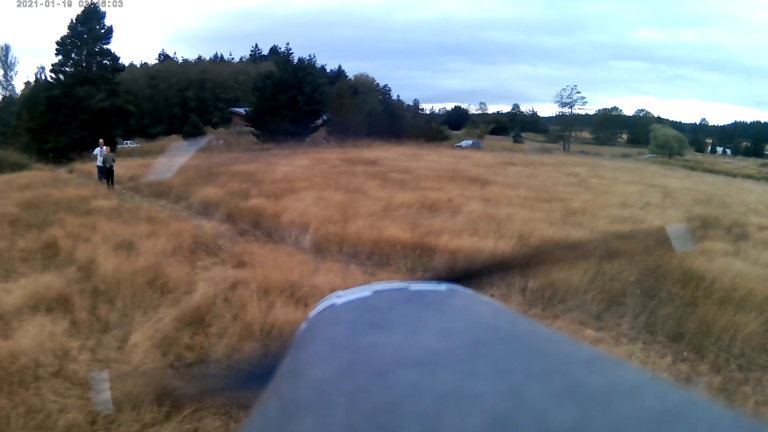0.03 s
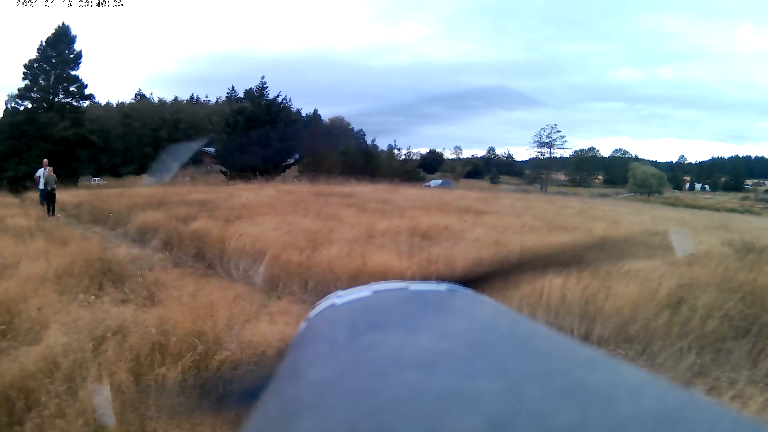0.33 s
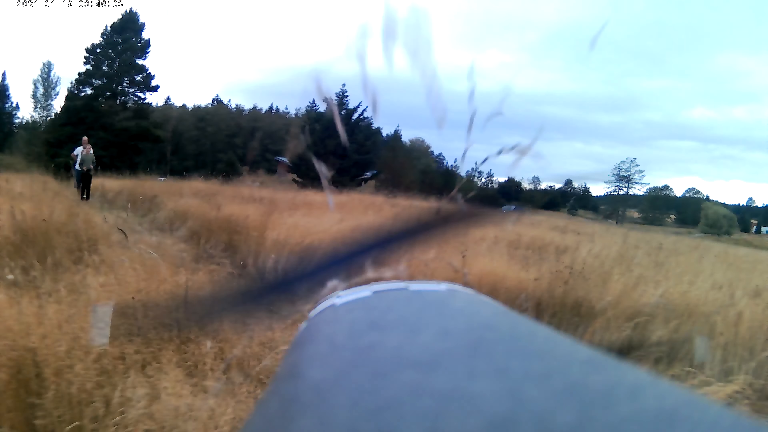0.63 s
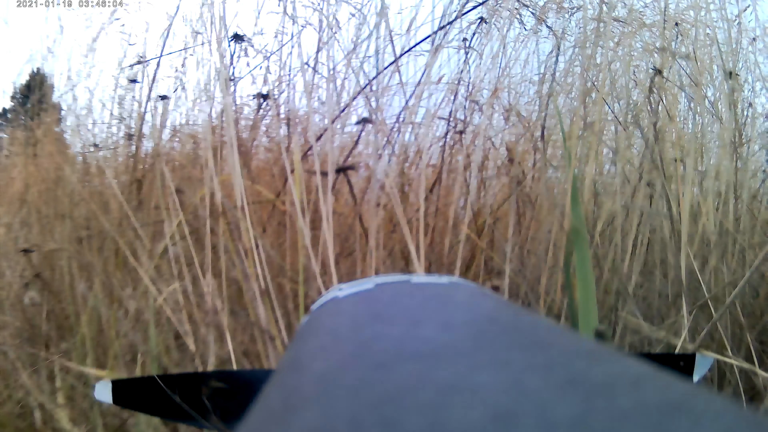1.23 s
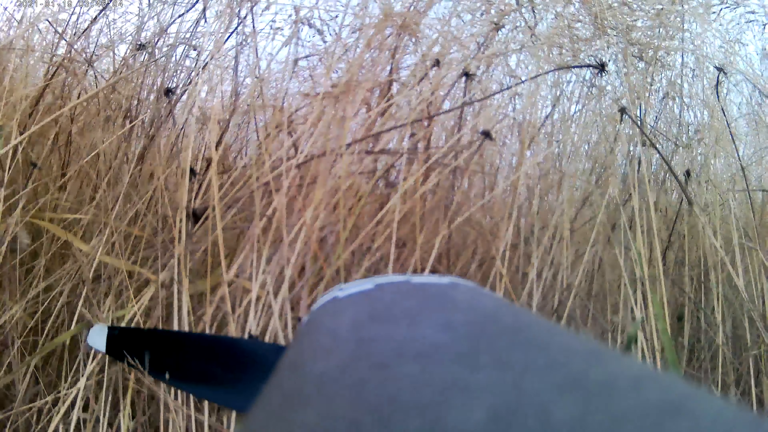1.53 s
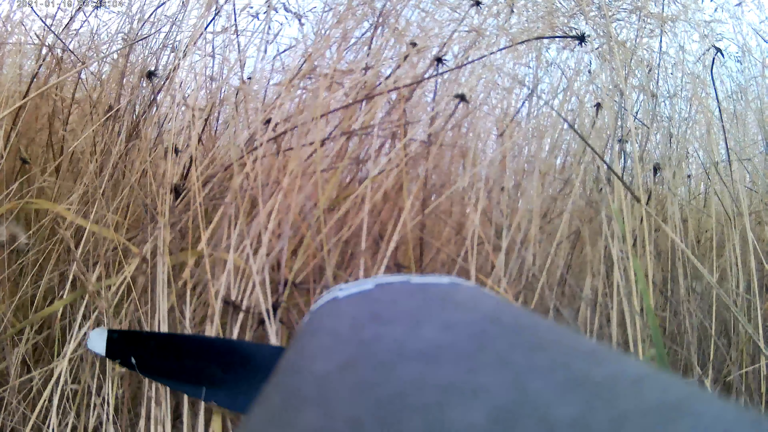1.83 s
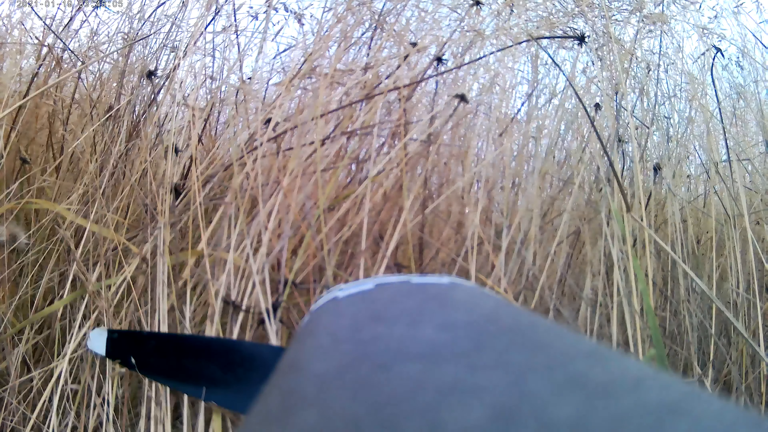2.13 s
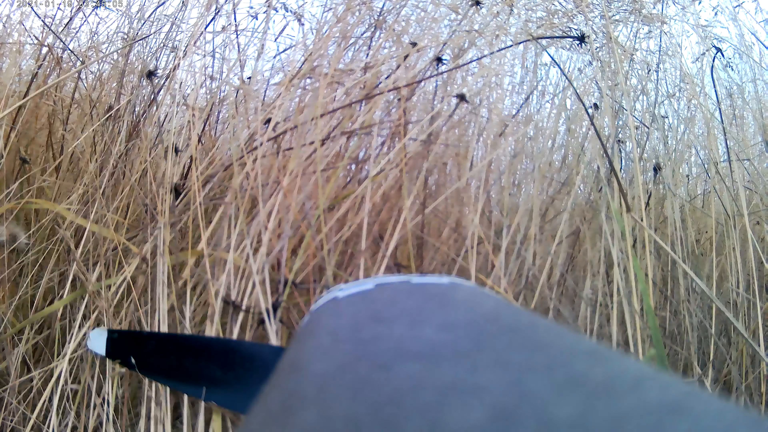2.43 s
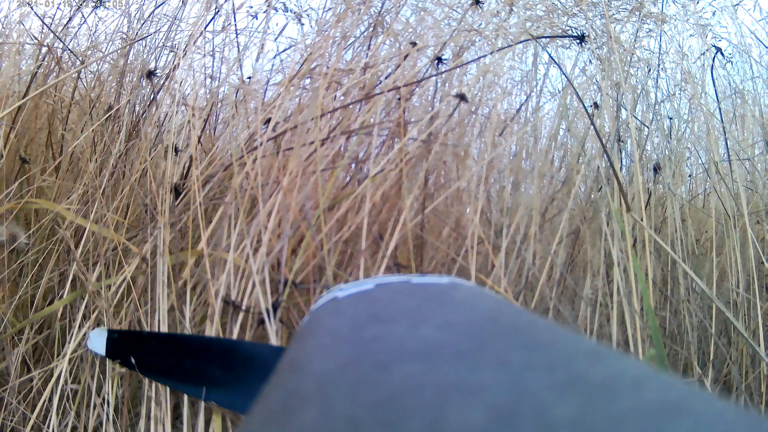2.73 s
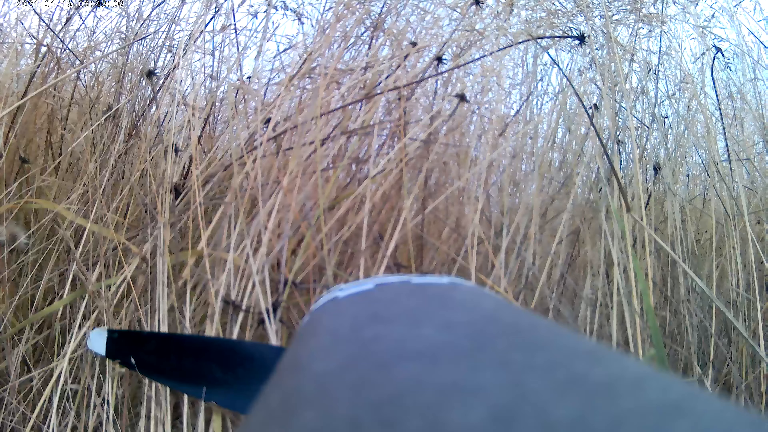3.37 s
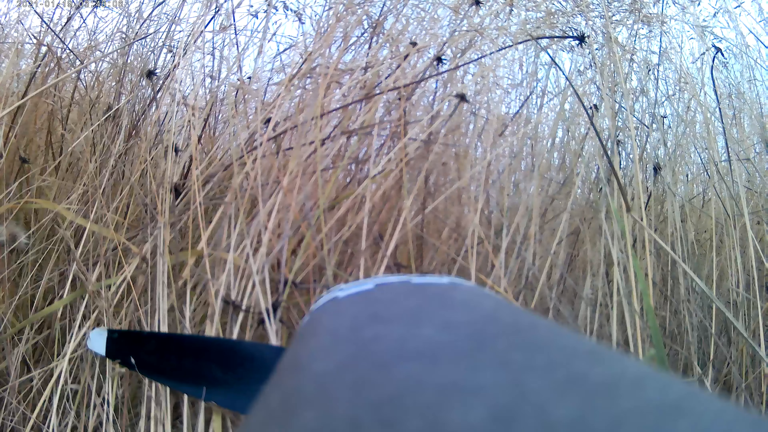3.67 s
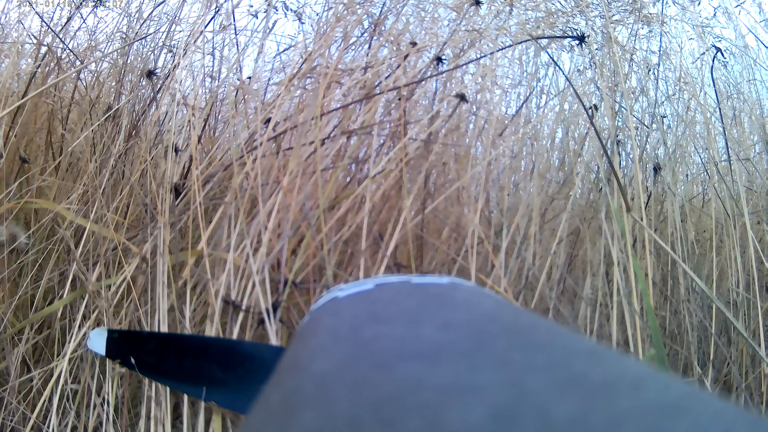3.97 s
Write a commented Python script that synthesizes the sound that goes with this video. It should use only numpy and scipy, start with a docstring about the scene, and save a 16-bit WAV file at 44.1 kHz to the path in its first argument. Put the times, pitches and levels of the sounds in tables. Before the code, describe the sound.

Wind roars over a gliding model plane, which crashes into dry grass; its servos whirr.

```python
"""A field of tall dry grass: a small model plane glides in low and crashes, heard from on its back.
Wind overloads the microphone and nearly hides the motor's whine. Stalks lash the airframe, whose
modes ring as it bumps to a stop. The servo gears whirr, then only twitch in a light breeze."""
import sys
import numpy as np
from scipy import signal
from scipy.fft import rfft, irfft
from scipy.io import wavfile

SR = 44100
rng = np.random.default_rng(int(sys.argv[2]) if len(sys.argv) > 2 else 0)


def pcm_store(signal):
    """Save signal as 16-bit PCM."""
    levels = np.round(np.clip(np.atleast_2d(signal), -1, 1) * 32767)
    wavfile.write(sys.argv[1], SR, levels.astype(np.int16).T)


N = 176400
T = np.arange(N) / SR

# servo gear noise spectrum: f/Hz, level/dB
GEAR_SPECTRUM = [(60, -16.5), (230, -5), (760, 0), (1100, -10), (1450, -6.5), (2600, -22.5), (4200, -19.5)]


def from_db(db):
    """Decibels to gain."""
    return 10 ** (np.asarray(db) / 20)


def rms_one(x):
    """Scale to unit power."""
    return x / np.sqrt(np.mean(x ** 2) + 1e-20)


def noise():
    """White noise, unit power."""
    return rng.standard_normal(N)


def in_time(rows):
    """Columns of a curve at every sample."""
    times_s, *columns = np.transpose(rows)
    return [np.interp(T, times_s, column) for column in columns]


def phase(hz):
    """Running phase/rad of a varying frequency."""
    return 2 * np.pi * np.cumsum(hz) / SR


def colour(x, spectrum):
    """Shape by (f/Hz, level/dB) rows; unit power."""
    hz = np.maximum(np.arange(N // 2 + 1) * SR / N, 1)
    points_hz, points_db = np.transpose(spectrum)
    gain = from_db(np.interp(np.log(hz), np.log(points_hz), points_db))
    return rms_one(irfft(rfft(x) * gain, N))


def drift(rate_hz):
    """Random wander, spread 1."""
    hz = np.arange(N // 2 + 1) * SR / N
    return rms_one(irfft(rfft(noise()) / (1 + (hz / rate_hz) ** 2), N))


def grains(per_s, spread_db):
    """Random clicks of uneven size; unit power."""
    sizes = from_db(spread_db * np.minimum(rng.exponential(1, N), 4)) * rng.choice([-1, 1], N)
    return rms_one(sizes * (rng.random(N) < per_s / SR))


def clicks(rows):
    """One click per (t/s, level/dB) row."""
    out = np.zeros(N)
    for at_s, db in rows:
        out[int(at_s * SR)] += from_db(db)
    return out


def decay(x, tau_s):
    """Give each click an exponential tail."""
    return signal.lfilter([1], [1, -np.exp(-1 / (tau_s * SR))], x + 1e-18)


def ring(x, hz, t60_s):
    """Resonator: a unit click starts a decaying unit sine."""
    r, w = from_db(-60 / (t60_s * SR)), 2 * np.pi * hz / SR
    return signal.lfilter([0, np.sin(w)], [1, -2 * r * np.cos(w), r * r], x + 1e-18)


def ring_modes(x, modes):
    """Sum of resonators, alternating in sign."""
    return sum((-1) ** k * from_db(db) * ring(x, hz, t60_s) for k, (hz, db, t60_s) in enumerate(modes))


def cut(x, hz, kind="low"):
    """Second-order low- or high-pass."""
    return signal.sosfilt(signal.butter(2, min(hz, SR / 3), kind, fs=SR, output="sos"), x)


def airframe(push):
    """The hull's modes answer a push."""
    # f/Hz, level/dB, t60/s
    hull_modes = [(143, -1.5, .04), (235, -1, 0.12), (440, -1.5, 0.017), (664, 1.5, .03), (766, 6, 0.017),
                  (1415, -4, 0.019), (2090, -2, 0.011)]
    return ring_modes(push, hull_modes)


def field():
    """Faint, steady outdoor rumble."""
    # f/Hz, level/dB
    spectrum = [(15, 0.5), (40, 5), (110, 1.5), (330, -22), (1500, -28), (2200, -42), (3800, -37.5)]
    return from_db(-44) * colour(noise(), spectrum)


def settling_hum():
    """A faint, brief hum rises as the plane settles."""
    # t/s, f/Hz, level/dB
    hum_curve = [(1.94, 359, -76.5), (2.0, 383, -42.5), (2.12, 382, -80)]
    hz, level_db = in_time(hum_curve)
    return from_db(level_db) * sum(np.sin(k * phase(hz)) / k ** 1.1 for k in range(1, 4))


def motor():
    """A thin, slightly unsteady whine."""
    # t/s, f/Hz, level/dB
    whine_curve = [(.2, 1479, -25.5), (.29, 1464, -22), (1.0, 1417, -25), (1.25, 1350, -120)]
    hz, level_db = in_time(whine_curve)
    return from_db(level_db) * np.sin(phase(hz * (1 + 0.0078 * drift(30))))


def servo_whirr():
    """Gear teeth grate over the hum of a small motor."""
    # t/s, level/dB
    run_curve = [(1.15, -32), (1.25, -19.5), (1.46, -18), (1.66, -23.5), (1.735, -40), (1.95, -68)]
    level_db, = in_time(run_curve)
    hum_hz, hum_db = 230.7, -11.5
    turn_rad = phase(hum_hz * (1 + 0.032 * drift(26)))
    hum = sum(np.sin(k * turn_rad) / k for k in range(1, 4))
    teeth = colour(grains(per_s=1200, spread_db=2.5) + .7 * noise(), GEAR_SPECTRUM)
    return from_db(level_db + 1.3 * drift(40)) * (teeth + from_db(hum_db) * hum)


def servo_ticks():
    """One small knock per control pulse, treble first; the gears rattle, the hull rings faintly."""
    # control pulses: t/s, level/dB
    twitches = [(1.717, -35), (1.739, -26.5), (1.761, -30), (1.783, -26.5), (1.805, -27), (2.047, -29),
                (2.069, -31), (2.094, -44), (2.51, -27.5), (2.861, -31.5), (2.883, -31), (3.434, -31),
                (3.455, -30.5)]
    # f/Hz, level/dB
    servo_modes = [(570, -12.5), (880, -2), (1560, -4), (1950, -13), (2820, -28.5), (3600, -26.5)]
    swell_cycles, tightness, spread_db = 3.2, 2.7, 1.9
    knocks = np.zeros(N)
    for hz, mode_db in servo_modes:
        cycles = hz * T[:SR // 20]
        swell = cycles / swell_cycles  # peaks at 1, as the gears take up
        envelope = (swell * np.exp(1 - swell)) ** tightness
        knock = from_db(mode_db) * envelope * np.sin(2 * np.pi * cycles)
        strikes = clicks([(at_s, db + spread_db * rng.standard_normal()) for at_s, db in twitches])
        knocks += signal.fftconvolve(strikes, knock)[:N]
    pulses = clicks(twitches)
    rattle = decay(pulses, tau_s=0.013) * colour(noise(), GEAR_SPECTRUM)
    hull = cut(airframe(pulses), hz=400, kind="high")
    return knocks + from_db(-13) * rattle + from_db(-20) * hull


def servo_chatter():
    """A second servo's loose gears give thin, rough ticks."""
    # t/s, level/dB
    ticks = [(1.708, -26.5), (1.720, -27), (1.743, -26), (1.786, -25), (1.962, -35), (2.096, -37),
             (2.379, -39.5), (2.400, -32.5), (2.575, -44.5)]
    # f/Hz, level/dB, t60/s
    servo_modes = [(1006, -4, 0.016), (1786, -3, 0.0088), (2490, -10, 0.01), (3450, -5, 0.0046)]
    pulses = clicks(ticks)
    crunch = 0.14 * decay(pulses, tau_s=.0024) * noise()
    return cut(ring_modes(pulses + crunch, servo_modes), hz=600, kind="high")


def wind():
    """Fluttering turbulence in flight; a deeper, soft rumble once the plane lies still."""
    # airflow before overload: t/s, level/dB
    airflow = [(0, -0.5), (.76, 0), (.81, -8.5), (.84, 1.5), (.98, -2.5), (1.1, 4.5), (1.17, -25.5),
               (1.25, -46), (1.4, -12), (1.55, -37.5), (1.95, -27.5), (2.28, -39), (2.45, -32.5),
               (2.62, -34), (2.76, -50)]
    # f/Hz, level/dB
    flight_spectrum = [(15, -10.5), (36, -5), (90, -2), (170, -9.5), (330, -17.5), (700, -23.5),
                       (1500, -34), (3800, -63)]
    breeze_spectrum = [(10, -10), (20, 3), (40, -8.5), (80, -20), (160, -29.5), (400, -42.5), (1500, -45),
                       (3800, -64)]
    landed_s, slowing_s, gust_db, flutter_db = 1.5, 0.32, -0.5, 3
    level_db, = in_time(airflow)
    flying = np.clip((landed_s - T) / slowing_s, 0, 1)
    rush = colour(noise(), flight_spectrum)
    eddies = rms_one(from_db(flutter_db * drift(210)))
    rush += (eddies - 1) * cut(rush, hz=300, kind="high")
    air = flying * rush + (1 - flying) * colour(noise(), breeze_spectrum)
    return air * from_db(level_db + gust_db * drift(36))


def throb():
    """An uneven pressure wave drives the microphone from one limit to the other."""
    # t/s, level/dB
    pressure_curve = [(0, -7.5), (.765, -6), (.79, 3), (.815, 4), (.835, -6.5), (.93, 0), (.965, 5),
                      (1.0, -9), (1.25, -76)]
    level_db, = in_time(pressure_curve)
    hz = 40.72 * (1 + .15 * drift(20))
    return from_db(level_db) * np.sin(phase(hz))


def buffets():
    """Buffets shake the hull in flight: short, hollow thumps of varying pitch."""
    # t/s, level/dB
    hits = [(.137, -0.5), (.269, 0), (0.309, 2.5), (.381, 0), (.473, 0.5), (0.514, 0.5), (0.698, 5.5)]
    width_s, gain_db = 0.0042, -5.5
    out = np.zeros(N)
    for at_s, db in hits:
        swell = np.exp(-np.minimum(abs(T - at_s) / width_s, 10) ** 2)
        thump = ring(swell * noise(), hz=473 * np.exp(0.12 * rng.standard_normal()), t60_s=0.018)
        thump *= np.sqrt(2 * width_s * SR / np.sum(thump ** 2))
        out += from_db(db + gain_db) * thump
    return out


def grass():
    """Stalks lash and swish along the hull in clumps; a thick tuft adds a sudden, dying crunch."""
    # sweeping, then settling: t/s, level/dB
    sweep_curve = [(0, -27.5), (.25, -15.5), (.58, -24.5), (.66, -13.5), (.77, -16.5), (.8, -21),
                   (.98, -24.5), (1.01, -2), (1.07, 4.5), (1.14, -1), (1.175, -7), (1.26, -18),
                   (1.38, -16.5), (1.43, -28.5), (2.25, -75)]
    # strikes on the wing: t/s, level/dB
    tufts = [(.624, 3.5), (.636, -4), (.647, 5), (.658, 3), (.755, -6), (.825, -1), (.996, 2.5), (1.008, 3),
             (1.056, 12)]
    # f/Hz, level/dB
    stalk_spectrum = [(40, -13.5), (240, -3.5), (750, 1.5), (1450, -3.5), (2300, -11), (4200, -16)]
    level_db, = in_time(sweep_curve)
    strikes = decay(clicks(tufts), tau_s=0.0054)
    contact = grains(per_s=980, spread_db=3) + .6 * noise()
    clumps = from_db(level_db + 3.3 * drift(45))
    return colour(contact, stalk_spectrum) * (clumps + strikes)


def bumps():
    """The plane hits grass and ground: hollow knocks whose gritty contact shakes the airframe."""
    # t/s, level/dB, f/Hz, length/s
    impacts = [(1.023, 7.5, 645.4, 0.02), (1.185, -1, 725, 0.01), (1.224, -0.5, 1796, 0.0032),
               (1.273, 0, 459.4, 0.011), (1.28, -6, 140, 0.019), (1.315, -1.5, 860, 0.012),
               (1.336, -3, 170.4, 0.022), (1.357, 2, 775, 0.0062)]
    attack_s, sag_per_length, grit_db, hull_db = 0.003, .04, -8.5, -10.5
    waver = .05 * drift(120)
    out = np.zeros(N)
    for at_s, level_db, hz, length_s in impacts:
        age_s = np.maximum(T - at_s, 0)
        lengths = np.minimum(age_s / length_s, 10)
        force = (1 - np.exp(-age_s / attack_s)) * np.exp(-lengths ** 2)
        knock = force * np.sin(phase(hz * (1 - sag_per_length * lengths + waver)))
        grit = force * rms_one(cut(noise(), hz=1790))
        hull = airframe(grit)
        hull *= np.sqrt(length_s * SR / np.sum(hull ** 2))
        out += from_db(level_db) * (knock + from_db(grit_db) * grit + from_db(hull_db) * hull)
    return out


def scene():
    """Everything reaches one microphone on the plane."""
    background = field()
    flight = wind() + buffets() + throb() + motor()
    crash = grass() + bumps() + settling_hum()
    servos = servo_whirr() + servo_ticks() + servo_chatter()
    return (background + flight + crash + servos)[None]


def record(dry):
    """The input overloads, passes a narrow voice band, clips again and loses its top treble."""
    input_limit, output_limit, voice_band_hz, cutoff_hz = 0.8, 0.74, 3738, 16000
    voice_band = signal.butter(8, voice_band_hz, fs=SR, output="sos")
    top_cut = signal.ellip(10, .05, 50, cutoff_hz, fs=SR, output="sos")
    narrow = signal.sosfiltfilt(voice_band, np.clip(dry, -input_limit, input_limit))
    return signal.sosfiltfilt(top_cut, np.clip(narrow, -output_limit, output_limit))


dry = scene()
out = record(dry)
pcm_store(out)
```